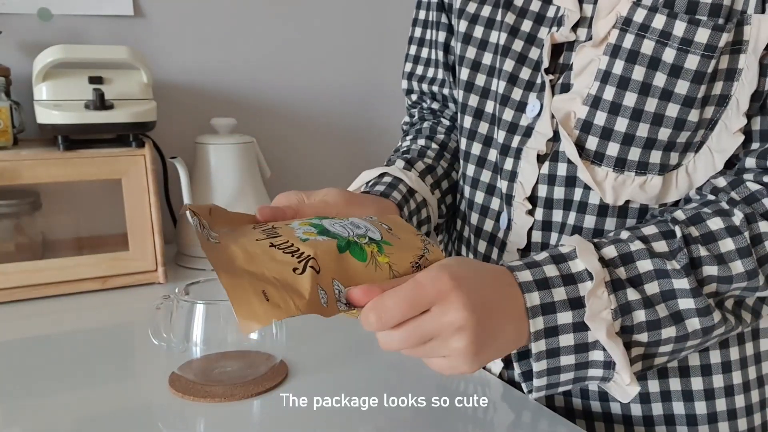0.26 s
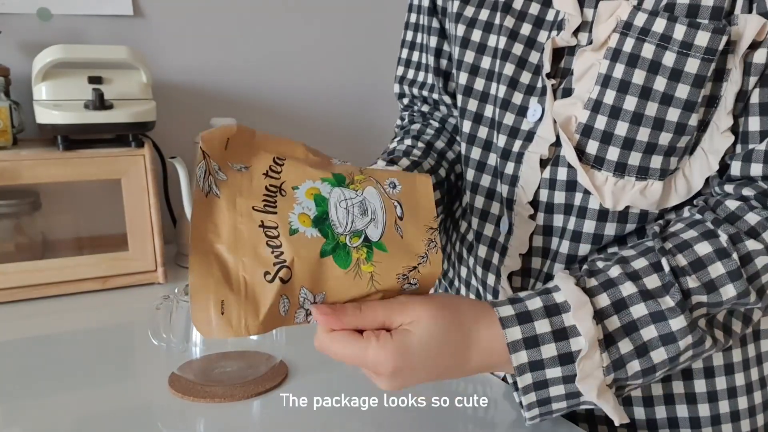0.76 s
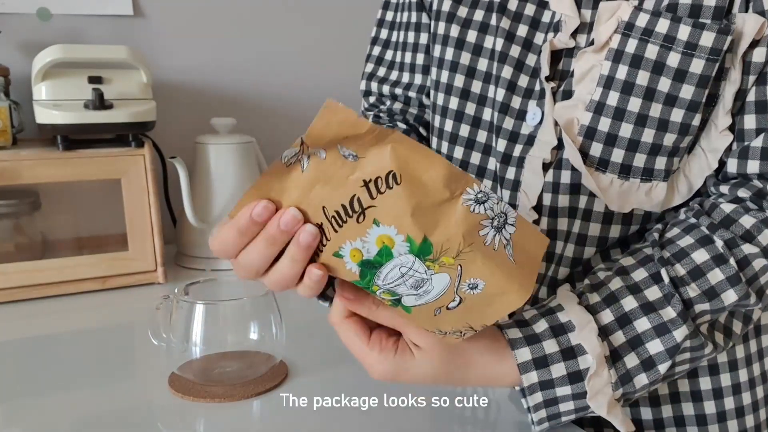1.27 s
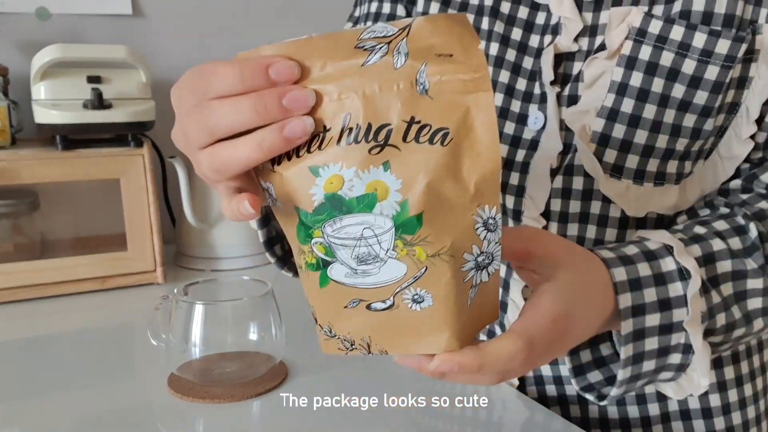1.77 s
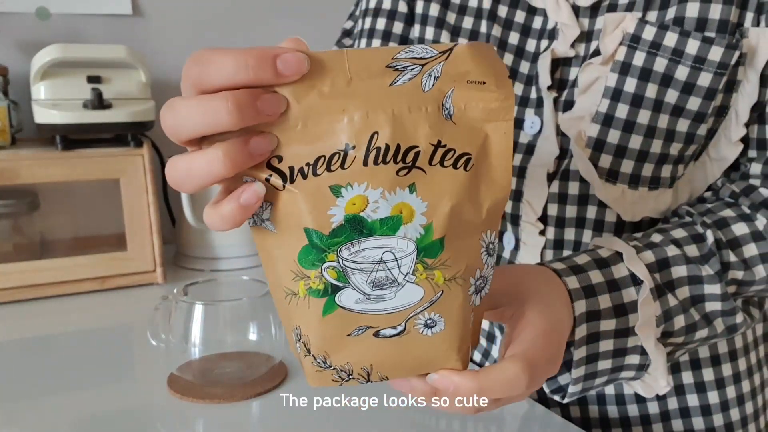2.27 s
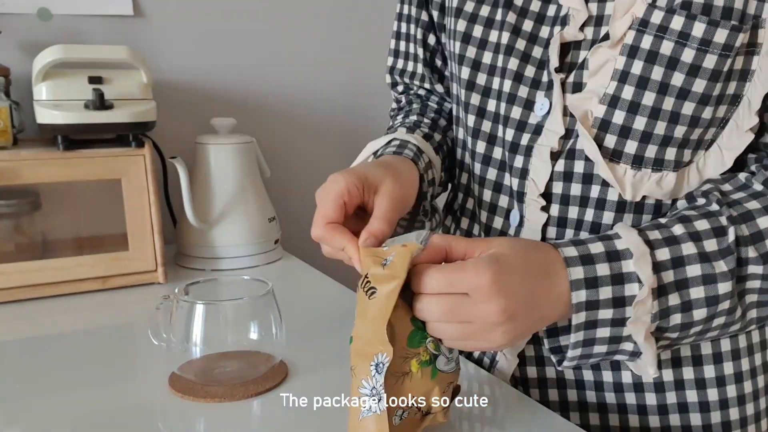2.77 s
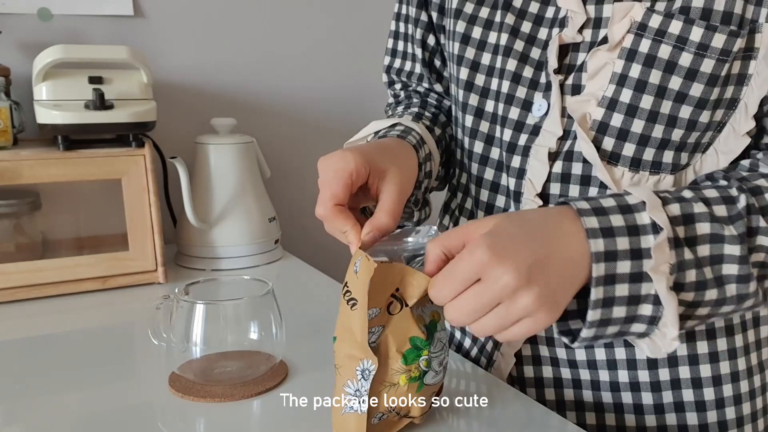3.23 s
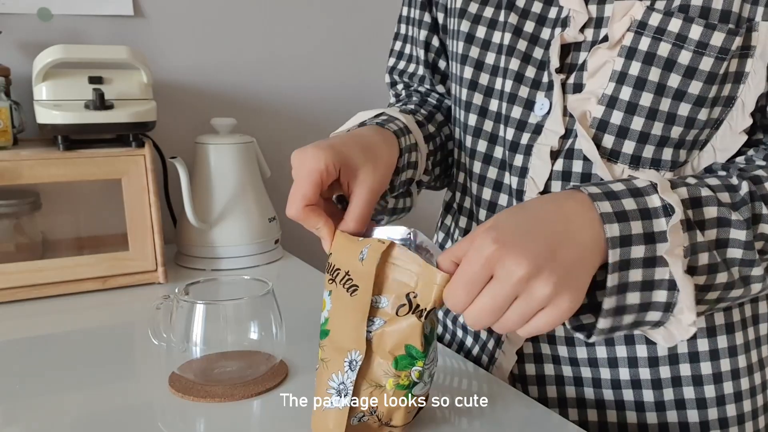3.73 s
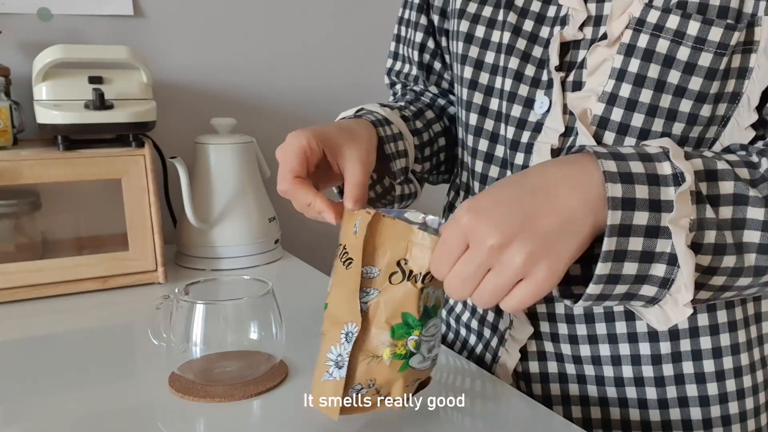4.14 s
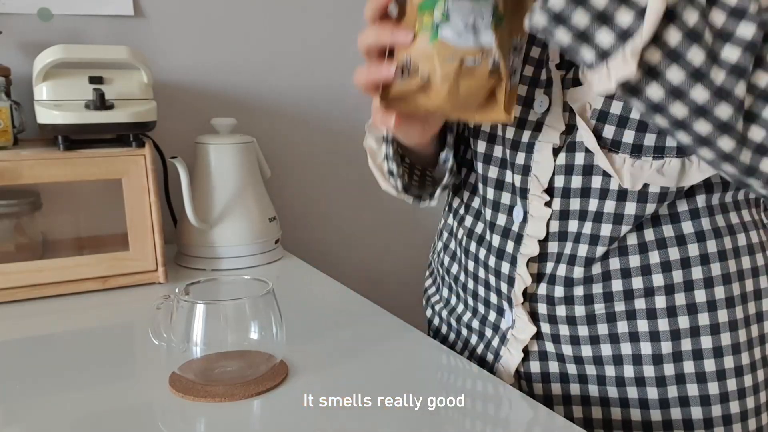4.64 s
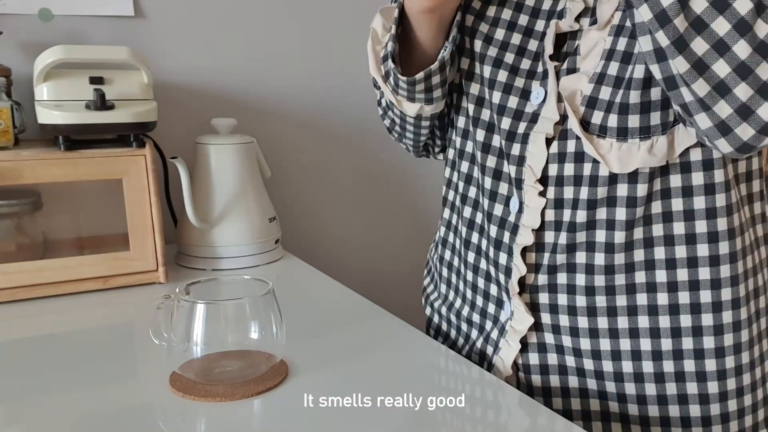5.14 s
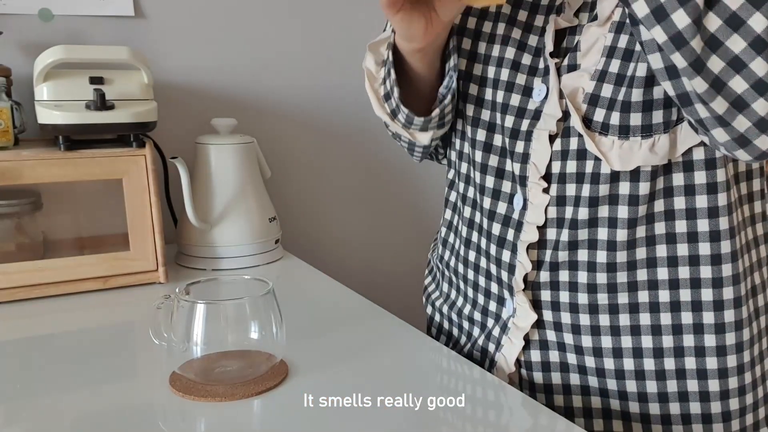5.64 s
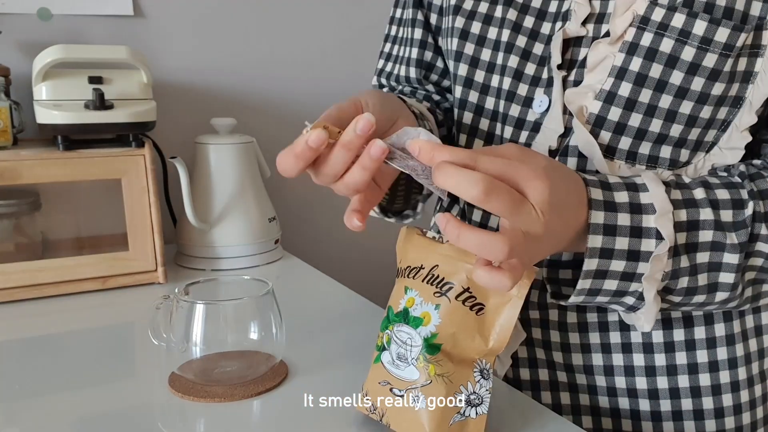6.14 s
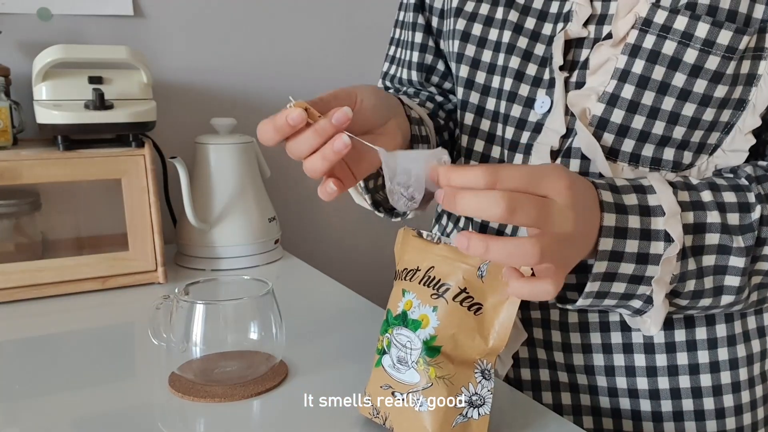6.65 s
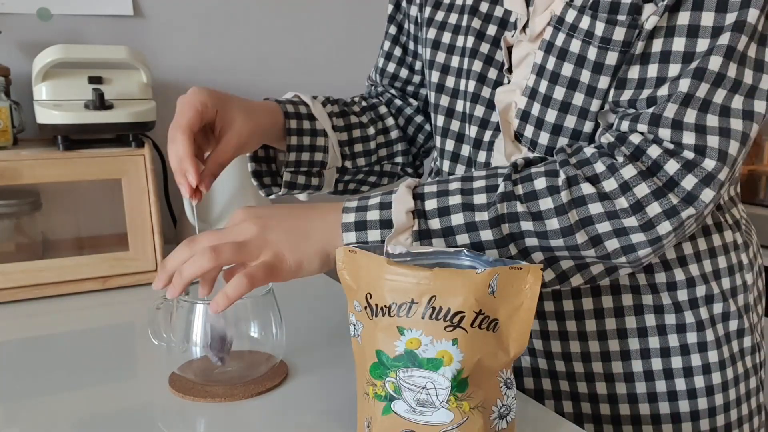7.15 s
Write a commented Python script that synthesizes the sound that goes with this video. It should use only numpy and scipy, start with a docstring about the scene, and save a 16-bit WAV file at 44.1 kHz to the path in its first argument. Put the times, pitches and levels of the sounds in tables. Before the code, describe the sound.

Hands turn a stiff paper pouch close to the microphone in a small kitchen, with crisp crease snaps, finger rubbing and soft hollow thuds. After a lull with faint far ticks, the seal is pulled open in hard, dense crackles and heavy rubbing. Then it quietens; a few light rustles follow as a tea bag is taken out, ending in a faint rising squeak.

```python
"""Two hands turn a stiff paper tea pouch in a small kitchen: creases snap, the body thuds, fingers rub.
Far ticks run faintly, then the zip seal is pulled open with the hardest snaps and heavy rubbing.
The pouch quietens, ticks return and a tea bag is taken out with short noise swells and a faint, rising squeak.
Snaps are jolts ringing a panel, thuds sagging sines, rubs and swells grainy noise, the squeak fuzzy tones.
Quiet air and rumble last throughout; the room rings after the near sounds and carries the ticks."""
import sys
import numpy as np
from scipy import signal
from scipy.fft import rfft, irfft
from scipy.io import wavfile
from scipy.ndimage import uniform_filter1d

SR = 44100
rng = np.random.default_rng(int(sys.argv[2]) if len(sys.argv) > 2 else 0)


def master(y):
    """Save y as 16-bit WAV."""
    cut = np.clip(np.atleast_2d(y).T, -1, 1)
    pcm = np.round(cut * 32767)  # scale
    wavfile.write(sys.argv[1], SR, pcm.astype(np.int16))


N = 325890


def amp(db):
    """Decibels to gain."""
    return 10 ** (np.asarray(db) / 20)


def unit(x):
    """Scales to rms 1."""
    return x / np.sqrt(np.mean(x ** 2) + 1e-20)


def read(points, hz):
    """Joins a spectrum by straight lines over log frequency."""
    f, value = np.transpose(points)
    return np.interp(np.log(hz + 1), np.log(f + 1), value)


def add(mix, s, sound):
    """Mixes a sound in at time s."""
    part = mix[:, max(round(s * SR), 0):][:, :sound.shape[-1]]
    part += sound[..., :part.shape[1]]


def freqs(size):
    """Frequencies of a spectrum of that many samples."""
    return np.fft.rfftfreq(size, 1 / SR)


def causal(db):
    """Minimum-phase response of a dB curve: it rings only after the blow."""
    mirrored_db = np.concatenate([db, db[-2:0:-1]])
    log_gain = np.log(amp(mirrored_db))
    return np.exp(np.conj(signal.hilbert(log_gain)))[:len(db)]


def tint(x, points, size=2048):
    """Colours a sound with a short minimum-phase filter."""
    response = irfft(causal(read(points, freqs(size))))
    return signal.oaconvolve(x, response[None], axes=1)[:, :x.shape[1]]


def grains(size, spread_db, apart):
    """Stereo noise in tiny grains of uneven size; apart sets how far the ports differ."""
    z = rng.standard_normal((size, 3)).T
    sizes = amp(spread_db * np.minimum(rng.exponential(1, size // 32 + 1), 5))
    held = np.repeat(sizes, 32)[:size]  # one size every 32 samples
    return unit((z[0] + apart * z[1:]) * held)


# spectrum of the quiet air: pitch_hz, level_db
AIR_COLOUR = [(25, -3), (65, -2), (120, -9), (350, -12.5), (1200, -23.5), (2200, -22), (5000, -31.5),
              (10000, -33), (16000, -30)]
AIR_DB = -70


def hush(rumble_db=-76):
    """Quiet room air, and a low rumble that differs between the ports."""
    air = unit(tint(grains(N, spread_db=-2, apart=0.59), AIR_COLOUR, size=8192))
    rumble_colour = [(20, -24), (45, -1), (65, 5.5), (110, -16.0), (300, -51.5)]
    rumble = unit(tint(rng.standard_normal((2, N)), rumble_colour, size=8192))
    return amp(AIR_DB) * air + amp(rumble_db) * rumble


# runs of faint, evenly spaced far ticks: first_s, last_s, level_db before colour and room
TICK_RUNS = [(1.696, 2.61, -10), (4.842, 5.3, -11.5), (6.411, 6.42, -11), (6.924, 7.15, -13.5)]
# spectrum of a tick: pitch_hz, level_db
TICK_SPECTRUM = [(300, -37.5), (1700, -9), (2700, -26.5), (3130, -1.5), (3600, -18), (4300, -18),
                 (4950, -9.5), (5600, -21.5), (10000, -23.5), (16000, -15)]
TICK_EVERY_S = .2315


def far_ticks():
    """Small hard ticks from across the kitchen, heard only by way of the walls."""
    clicks = np.zeros((2, N))
    for first, last, db in TICK_RUNS:
        for s in np.arange(first, last + TICK_EVERY_S / 2, TICK_EVERY_S):
            add(clicks, s - .006, amp([db]))  # the way round by the walls takes a few ms
    return tint(clicks, TICK_SPECTRUM)


# how long the room takes to fall 60 dB: pitch_hz, decay_s
ROOM_DECAY = [(100, 0.3), (400, 0.28), (1000, 0.39), (3000, 0.25), (9000, 0.29), (15000, .24)]
# spectrum of the reflections: pitch_hz, level_db
ROOM_SPECTRUM = [(60, 4), (200, 3), (450, 0.5), (1000, -3.5), (2000, 1), (4000, -2.5), (9000, -3),
                 (15000, -2)]


def kitchen(gap_s=0.0058, build_s=0.0011, unlike_hz=1250, size=24000):
    """Response of the room: dense reflections, each band dying at its own speed, bass alike in both ports."""
    taps = rng.choice([-1., 1.], (2, size)) * (rng.random((2, size)) < .2)
    hz, t, z = signal.stft(taps, SR, nperseg=256)
    same = np.sinc(hz[:, None] / unlike_hz)
    z[1] = same * z[0] + np.sqrt(1 - same ** 2) * z[1]
    decay = amp(-60 * t / read(ROOM_DECAY, hz)[:, None])
    tail = signal.istft(z * decay, SR, nperseg=256)[1][:, :size]
    since_gap = np.maximum(np.arange(size) / SR - gap_s, 0)
    tail *= 1 - np.exp(-since_gap / build_s)
    return tint(tail / np.linalg.norm(tail[0]), ROOM_SPECTRUM)


# moments when the room's ring stops dead: time_s
RING_STOPS_S = [2.72, 5.805]


def reverberate(send, move_hz=1.7):
    """The moving pouch drifts between two paths through the room; the ring stops dead at two moments."""
    angle = 2 * np.pi * move_hz * np.arange(N) / SR
    stops = [round(s * SR) for s in RING_STOPS_S]
    wet = np.zeros((2, N))
    for share in (np.cos(angle), np.sin(angle)):
        room = kitchen()
        stretches = np.split(send[:1] * share, stops, axis=1)
        rings = [signal.fftconvolve(part, room, axes=1)[:, :part.shape[1]] for part in stretches]
        wet += np.hstack(rings)
    return wet


# a faint rising squeak: time_s, level_db, pitch_hz
SQUEAK_PATH = [(7.09, -68, 2505), (7.15, -67.5, 2556), (7.22, -72.5, 2600), (7.32, -78.5, 2600)]


def squeak(width_hz=65, upper_width_hz=260, upper_hz=4000, upper_db=-4, upper_late_s=.06, climb=5,
           hollow_hz=770, hollow_width_hz=110, hollow_db=-3, hollow_early_s=0.022):
    """A fuzzy whistle as the tea bag enters the glass pot; a hollow tone leads, an airy band climbs above."""
    s, db, hz = np.transpose(SQUEAK_PATH)
    t = np.arange(s[0], s[-1], 1 / SR)
    pitch = np.interp(t, s, hz)
    upper = upper_hz * (pitch / hz.mean()) ** climb
    hollow = np.full(len(t), hollow_hz)
    bands = [(pitch, width_hz, 0, 0), (upper, upper_width_hz, upper_db, upper_late_s),
             (hollow, hollow_width_hz, hollow_db, -hollow_early_s)]
    out = np.zeros((2, N))
    for track, width, band_db, late in bands:
        lowpass = signal.butter(2, width, fs=SR, output="sos")
        fuzz = signal.sosfilt(lowpass, rng.standard_normal((2, len(t))))
        tone = unit(fuzz * np.sin(2 * np.pi * np.cumsum(track) / SR))
        add(out, s[0] + late, np.interp(t, s, amp(db + band_db)) * tone)
    return out


def noise_swell(rise, fall, db, hz, octaves):
    """One band of grainy noise swells and dies; it peaks half a second in."""
    t = np.arange(SR) / SR - .5
    band = 1 / (1 + (np.log2((freqs(SR) + 1) / hz) / octaves) ** 2 / 2) ** 2
    noise = unit(irfft(rfft(grains(SR, spread_db=3.5, apart=0.91)) * band))
    envelope = np.exp(np.minimum(t / rise, -t / fall))
    return amp(db) * noise * envelope * signal.windows.hann(SR) ** .5


# short swells of noise (quick slides, brief hisses and a few low rumbles):
# peak_s, length_s (rise plus fall constants), level_db, centre_hz
NOISE_SWELLS = [(0.109, 0.0096, -27, 8900), (0.602, 0.069, -42.5, 730), (1.003, 0.069, -40.5, 374),
                (1.295, 0.094, -53.5, 9000), (1.322, 0.071, -49, 3110), (2.003, 0.029, -47.5, 1720),
                (2.015, 0.06, -59.5, 9500), (3.205, 0.092, -44, 200), (3.494, 0.021, -46, 4920),
                (4.204, 0.0083, -25.5, 9870), (4.265, 0.0067, -30, 407), (4.604, 0.12, -60, 9000),
                (5.356, 0.033, -58.5, 1088), (5.969, 0.019, -51, 9350), (5.977, 0.34, -67.5, 76.5),
                (6.054, 0.03, -41.5, 9930), (6.051, 0.019, -41, 2870), (6.608, 0.1, -58, 976),
                (6.622, 0.065, -62, 3100), (6.634, .04, -63.5, 9040), (6.934, .2, -70.5, 61.8)]
SWELL_RISE_SHARE, SWELL_OCTAVES = .58, 1  # share of the length spent rising; bandwidth


def noise_swells():
    """Places each short swell of noise so that it peaks at its own time."""
    out = np.zeros((2, N))
    for s, length, db, hz in NOISE_SWELLS:
        rise = SWELL_RISE_SHARE * length
        swell = noise_swell(rise, length - rise, db, hz, SWELL_OCTAVES)
        skipped = max(round((.5 - s) * SR), 0)  # drop what would fall before the start
        add(out, s - .5, swell[:, skipped:])
    return out


# hand friction while turning, opening and emptying: time_s, level_db before each stretch's trim
TURNING = [(0.0, -34), (0.19, -52.5), (0.33, -65.5), (0.63, -44), (0.76, -62), (0.88, -54), (1.11, -56.5),
           (1.33, -48.5), (1.49, -57.5), (1.62, -75.5), (1.99, -61), (2.15, -80)]
OPENING = [(3.1, -44.5), (3.288, -55), (3.526, -50.5), (3.686, -45.5), (3.832, -60), (3.99, -55.5),
           (4.036, -46.5), (4.154, -39.5), (4.198, -40), (4.358, -58.5), (4.71, -46.5), (4.8, -85)]
EMPTYING = [(5.6, -55), (5.722, -75.5), (6.524, -75.5), (6.7, -65.5)]
# the fingers press harder just before a crease gives, then relax
PRESS_S, RELAX_S = .01, 0.026
PRESS_DB, PRESS_PER_DB = -57.5, .5  # friction at that moment, and its growth with the strength of the snap


def effort(turn_db=-5, open_db=-11.0, empty_db=-2):
    """Friction of the hands as a gain: slow handling, and a press around every snap."""
    t = np.arange(0, N / SR, .002)
    power = np.zeros(len(t))
    for stretch, trim_db in ((TURNING, turn_db), (OPENING, open_db), (EMPTYING, empty_db)):
        s, level = np.transpose(stretch)
        touching = uniform_filter1d(1. * ((t >= s[0]) & (t <= s[-1])), size=17)
        power += (touching * amp(np.interp(t, s, level) + trim_db)) ** 2
    for s, _, db, _ in CREASE_SNAPS:
        # a press never reaches across a moment when the room's ring stops
        same_stretch = np.searchsorted(RING_STOPS_S, t) == np.searchsorted(RING_STOPS_S, s)
        press = np.exp(np.minimum((t - s) / PRESS_S, (s - t) / RELAX_S))
        power += (amp(PRESS_DB + PRESS_PER_DB * db) * press * same_stretch) ** 2
    return np.interp(np.arange(N) / SR, t, np.sqrt(power))


# how the pouch is held (turned in the air, pulled open, standing on the counter, lifted):
# start_s, body_db, fizz_db, room_send_db, left_lead_samples, rub_crispness_db
HOLDS = [(0, -10, -21.5, -3.5, 1.33, -3.5), (2.6, -4, -22, -2, 1.8, -14),
         (3.4, -0.5, -15.5, -3.5, 2.3, -7.5), (4.7, -20, -15.5, -1.5, 3.9, -9)]


def grip(s):
    """The way the pouch is held at time s: body, fizz, room, lead, crispness."""
    return HOLDS[sum(s >= row[0] for row in HOLDS[1:])][1:]


# spectra of the dull and the crisp part of the rubbing: pitch_hz, level_db
DULL_RUB = [(60, -20), (200, -9), (400, 6), (1000, -0.5), (1700, 4), (3000, -25), (8000, -42)]
CRISP_RUB = [(500, -27.5), (1500, -3), (3000, 7.5), (5500, -3), (10000, -8), (16000, -7)]


def rubbing(hands, dull_db=-2, dull_grain_db=4.5, crisp_grain_db=2.0, patchy_db=3):
    """Fingers and sleeves drag on paper, waking now one panel, now another, with a fine crackle on top."""
    dull = unit(tint(grains(N, spread_db=dull_grain_db, apart=1.0), DULL_RUB))
    crisp = unit(tint(grains(N, spread_db=crisp_grain_db, apart=1.0), CRISP_RUB))
    crisp_db = np.full(N, float(HOLDS[0][-1]))
    for s, *_, db in HOLDS[1:]:
        crisp_db[round(s * SR):] = db
    rub = hands * (dull * amp(dull_db) + crisp * amp(crisp_db))
    z = signal.stft(rub, nperseg=256)[2]
    # smooth random patches over pitch and time
    patches = uniform_filter1d(rng.standard_normal(z.shape[1:]), size=4, axis=0)
    patches = unit(uniform_filter1d(patches, size=6, axis=1))
    return signal.istft(z * amp(patchy_db * patches), nperseg=256)[1][:, :N]


def thud(db, hz, t60, rise_s=0.0004, sag=0.61):
    """The air-filled pouch bounces on the hand; its pitch sags as it relaxes."""
    t = np.arange(SR // 4) / SR
    turns = np.cumsum(hz * (1 + sag * (2 * np.exp(-t * hz / 2) - 1))) / SR
    return amp(db - 60 * t / t60) * (1 - np.exp(-t / rise_s)) * np.sin(2 * np.pi * turns)


# soft blows on the body of the pouch: start_s, level_db, pitch_hz (midway through the sag), decay_s (60 dB)
BODY_THUDS = [(0.754, -21, 328.5, 0.041), (1.006, -27.5, 105, 0.11), (1.008, -17, 330, 0.023),
              (1.19, -38.5, 101, 0.031), (2.882, -32, 105.8, 0.13), (3.222, -38.5, 83.7, 0.091),
              (3.588, -34.5, 90, 0.29), (3.598, -40, 60.05, 0.29), (2.93, -24, 150, 0.072)]


def thuds(room_db=-7):
    """Soft blows on the pouch; returns the sound toward the microphone and toward the walls."""
    near = np.zeros((2, N))
    for s, db, hz, t60 in BODY_THUDS:
        add(near, s, thud(db, hz, t60))
    return near, amp(room_db) * near


# the four bands of a snap (body, middle, treble, fizz): low_hz, high_hz
SNAP_BANDS = [(150, 550), (600, 1700), (2000, 5500), (8300, 14000)]
WIDE_PANEL_HZ, BODY_DB_PER_OCTAVE = 694, 11  # a wider panel rings lower and has more body
FIZZ_PER_DB, FIZZ_PER_SHARP_DB = 0.5829, .5  # fizz against treble grows with strength and sharpness


def snap_bands(ring_hz, db, sharp_db, body_db, fizz_db):
    """Levels of a snap in its four bands: body, middle, treble, fizz."""
    body = body_db + BODY_DB_PER_OCTAVE * max(np.log2(WIDE_PANEL_HZ / ring_hz), 0)
    fizz = sharp_db + fizz_db + FIZZ_PER_DB * db + FIZZ_PER_SHARP_DB * sharp_db
    return db + np.array([body, 0, sharp_db, fizz])


def snap(ring_hz, band_db, lead, ring_db=9, ring_octaves=0.2, scatter=0.15, scatter_s=0.0021, apart=.7,
         bend_s=.0006, bass_db=-14, sub_db=-32, size=1024):
    """A crease flips: one jolt and a spray of tiny ones ring the panel beside it for a few cycles."""
    hz, t = freqs(size), np.arange(size) / SR
    z = rng.standard_normal((3, size))
    spray = z[0] + apart * np.diff(z[1:], prepend=0) / 2
    jolt = scatter * spray * np.exp(-t / scatter_s)
    jolt[:, 0] += 1
    panel_db = ring_db / (1 + (np.log2((hz + 1) / ring_hz) / ring_octaves) ** 2)
    spectrum = rfft(jolt) * causal(panel_db)
    # the size of the crease sets how its energy divides among the bands
    power = np.mean(abs(spectrum) ** 2, axis=0)
    tilt = []
    for (lo, hi), db in zip(SNAP_BANDS, band_db):
        present_db = 10 * np.log10(power[(hz > lo) & (hz < hi)].mean())
        tilt.append((np.sqrt(lo * hi), db - present_db))
    body_db = tilt[0][1]
    tilt = [(35, body_db + sub_db), (110, body_db + bass_db)] + tilt  # a small panel radiates little bass
    spectrum = spectrum * causal(read(tilt, hz))
    # bending waves carry the treble faster: 1 kHz arrives bend_s late
    spectrum = spectrum * np.exp(-4j * np.pi * bend_s * np.sqrt(1000 * hz))
    spectrum[1] *= np.exp(-2j * np.pi * hz * lead / SR)  # the left port hears it lead samples sooner
    fade = np.minimum(1, 2 * (1 - t / t[-1])) ** 2
    return irfft(spectrum) * fade


def small_creases(hands, over_db=35, spread_db=4, ring_hz=1100, ring_octaves=0.56, sharp_db=-2,
                  sharp_spread_db=6, count=380):
    """Small creases give at random, as loud as the hands are busy."""
    out = np.zeros((2, N))
    times = rng.random(count) * N / SR
    traits = np.clip(rng.standard_normal((count, 4)), -2, 2)
    for s, (strength, pitch, sharp, place) in zip(times, traits):
        body_db, fizz_db, _, lead, crisp_db = grip(s)
        hz = ring_hz * 2 ** (ring_octaves * pitch)
        sharpness = sharp_db + crisp_db + sharp_spread_db * sharp
        bands = snap_bands(hz, spread_db * strength, sharpness, body_db, fizz_db)
        add(out, s, hands[int(s * SR)] * amp(over_db) * snap(hz, bands, lead + place))
    return out


# one row a buckling crease: start_s, ring_hz (of the panel), strength_db,
# sharpness_db (treble over middle, low for a soft fold)
CREASE_SNAPS = [(0.0937, 790, 3, 6.5), (0.104, 670, 9, -3), (0.1074, 1360, -10, 6), (0.2314, 3850, -2, 3.5),
                (0.251, 830, 5, -7), (0.2613, 1090, 8.5, -1.5), (0.2946, 3260, 7.5, 0),
                (0.3411, 3540, 5.5, 1), (0.3505, 440, 8, -12), (0.5792, 740, 9.5, -7.5),
                (0.5878, 710, 9.5, -35), (0.6279, 700, 6.5, -32), (0.6481, 960, 9, -7),
                (0.7533, 360, 3, -9), (0.8113, 600, 11.5, -5), (0.9168, 740, -2, -3.5),
                (0.9964, 2650, 6, 0), (1.1903, 570, -8, -14), (1.3803, 1770, -10.5, 1.5),
                (1.4028, 1780, -10, -10), (1.4192, 2340, -2, 0), (2.7219, 3500, -6.5, 3.5),
                (2.7418, 4340, 2.5, 10), (2.763, 1030, 15, -11.5), (2.778, 1030, 8.5, 4),
                (2.7827, 670, 10.5, -4.5), (2.8584, 550, 13.5, -5), (2.8644, 480, 10.5, -2.5),
                (2.874, 880, 16.5, -6), (2.8815, 2890, 8.5, 9), (2.884, 1030, 14.5, 2),
                (2.893, 2510, 14.5, 0), (2.8993, 2610, 17.5, -3), (2.936, 640, 14.5, -11),
                (2.939, 920, 21.5, -10), (2.9432, 2280, -0.5, 17.5), (3.1286, 660, 2.5, -18),
                (3.1705, 2860, -3, -1.5), (3.2032, 1152, 5.5, -18.5), (3.2283, 780, 14, -8),
                (3.4493, 390, -11, -19.5), (3.531, 640, -4, -15.5), (3.559, 660, 6, -25),
                (3.5751, 1150, 12, -13.5), (3.5891, 3570, 13, -0.5), (3.5919, 1110, 21.5, -8),
                (3.6257, 1130, 14, -4), (3.7484, 990, 5.5, -21.5), (3.7799, 1150, 5.5, -10),
                (3.8183, 1160, -2, -21.5), (3.9236, 360, -6.5, -34), (3.9568, 370, -6.5, -29),
                (3.9759, 1150, 17, -5.5), (4.1381, 696, -4.5, -9), (4.1626, 1150, 6, -11),
                (4.186, 1130, 11.5, -8), (4.1966, 870, 9, -3), (4.2414, 3200, 3, 1.5),
                (4.2825, 1150, 18, -5), (4.362, 2280, -6.5, 5.5), (4.5425, 1210, -2, -24),
                (4.6461, 1540, -7.5, -4), (4.7781, 1040, -4, -31), (5.5322, 1080, 4, -9.5),
                (5.655, 940, -8, -31), (5.7633, 1180, -2, -3), (6.137, 890, -4, -24)]
ROOM_PER_SHARP_DB = 0.0145  # sharper snaps send very slightly more to the room


def creases(snap_db=0, crinkle_db=-14, crinkle_s=.007, crinkle_spread_db=4, swing_db=1.45, count=2):
    """Snaps, each setting off smaller crinkles; returns sound toward the microphone and toward the walls."""
    near, send = np.zeros((2, 2, N))
    for s, ring_hz, db, sharp_db in CREASE_SNAPS:
        body_db, fizz_db, room_db, lead, _ = grip(s)
        band_db = snap_bands(ring_hz, db, sharp_db, body_db, fizz_db)
        place, side = rng.standard_normal(2)
        lead = lead + place
        balance = amp(snap_db + swing_db * np.array([[side], [-side]]))
        add(near, s, balance * snap(ring_hz, band_db, lead))
        # the walls get a flatter mix of the panel's rings
        room_gain = amp(room_db + ROOM_PER_SHARP_DB * sharp_db)
        add(send, s, room_gain * snap(ring_hz, band_db, lead, ring_db=5.0))
        for wait, pitch, *colour in rng.standard_normal((count, 6)):
            crinkle_bands = np.add(band_db, crinkle_spread_db * np.array(colour))
            crinkle = snap(ring_hz * 2 ** (pitch / 2), crinkle_bands, lead + pitch)
            add(near, s + crinkle_s * np.exp(wait / 2), amp(crinkle_db) * crinkle)
    return near, send


def scene(friction_room_db=-4, left_db=.3):
    """Near sounds reach the microphone directly and through the room."""
    snaps, snap_send = creases()
    blows, blow_send = thuds()
    hands = effort()
    friction = rubbing(hands) + small_creases(hands)
    soft = friction + noise_swells()
    wet = reverberate(snap_send + blow_send + amp(friction_room_db) * soft + far_ticks())
    direct = (snaps + blows + soft) * amp([[left_db], [-left_db]])
    return direct + wet + squeak() + hush()


# colour of the microphone: pitch_hz, level_db
MIC_COLOUR = [(30, 5), (100, 1.5), (1450, 0.5), (1900, -3), (2700, -0.5), (4000, 0.5), (5000, -1.5),
              (6300, -1.5), (7600, -7), (8500, 4), (12000, -0.5), (16000, -10)]
EDGE_HZ = 16000  # upper band limit


def record(dry):
    """Microphone colour with its notch and bass cut, overload of peaks past full scale, band limit."""
    bass_cut = signal.butter(2, 42, "highpass", fs=SR, output="sos")
    bright = signal.sosfilt(bass_cut, tint(dry, MIC_COLOUR))
    band_limit = signal.firwin(255, EDGE_HZ, window=("kaiser", 8), fs=SR)
    return signal.oaconvolve(np.clip(bright, -1, 1), band_limit[None], "same")


dry = scene()
out = record(dry)
master(out)
```